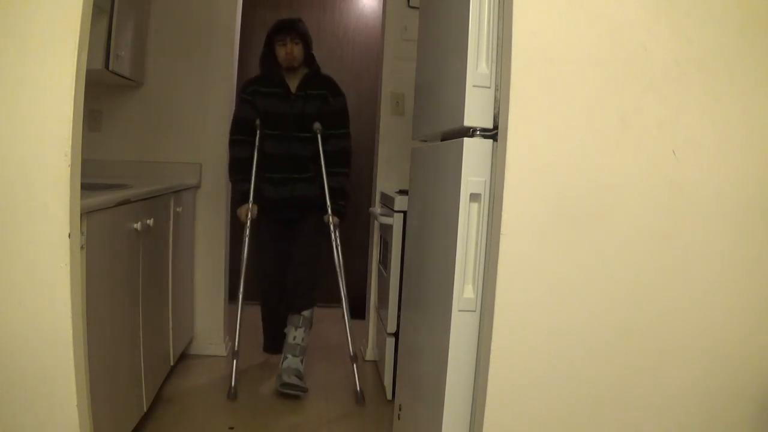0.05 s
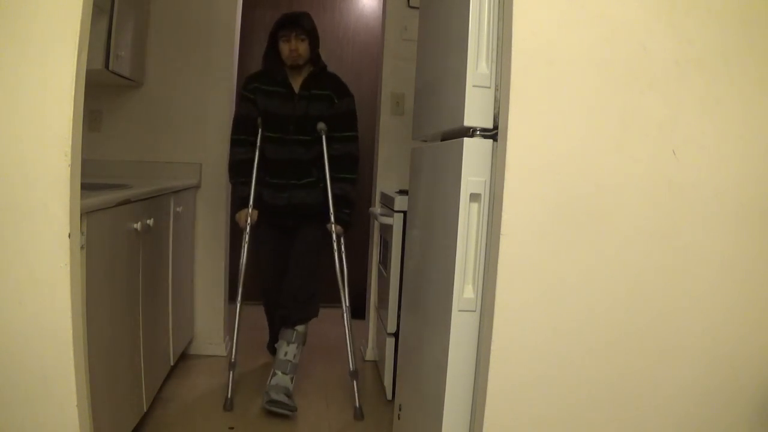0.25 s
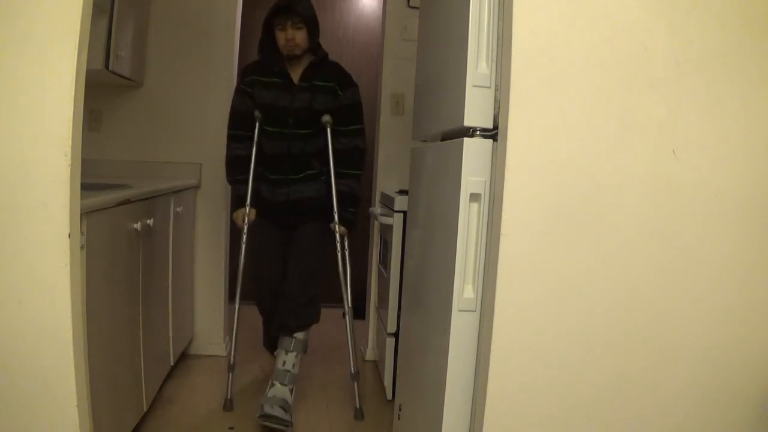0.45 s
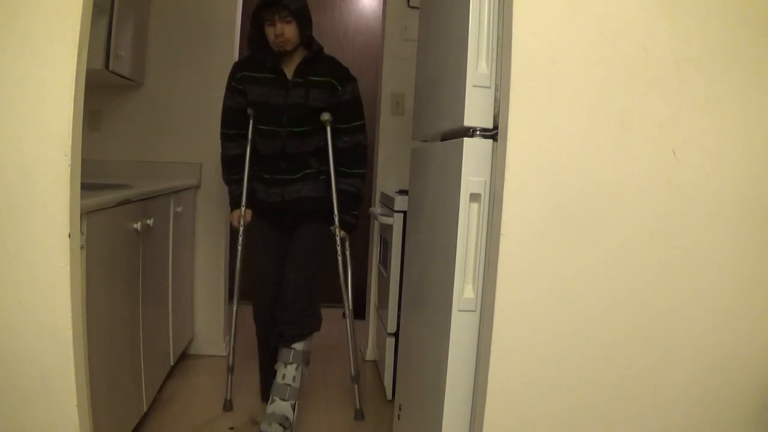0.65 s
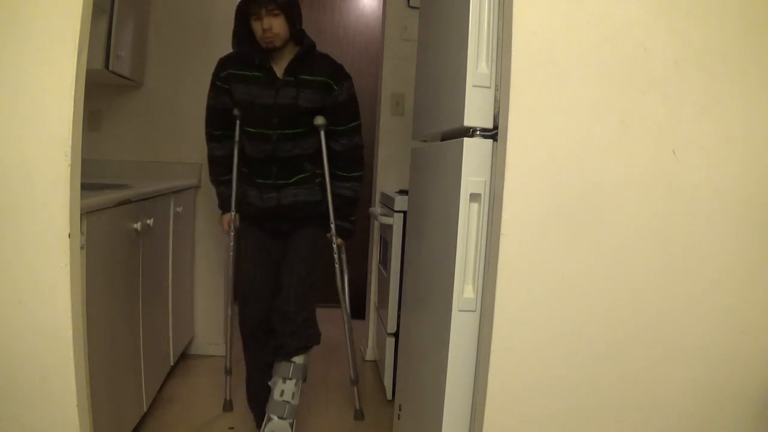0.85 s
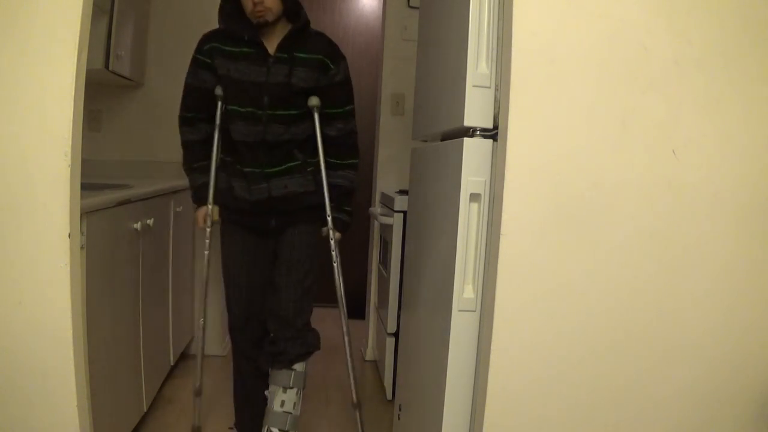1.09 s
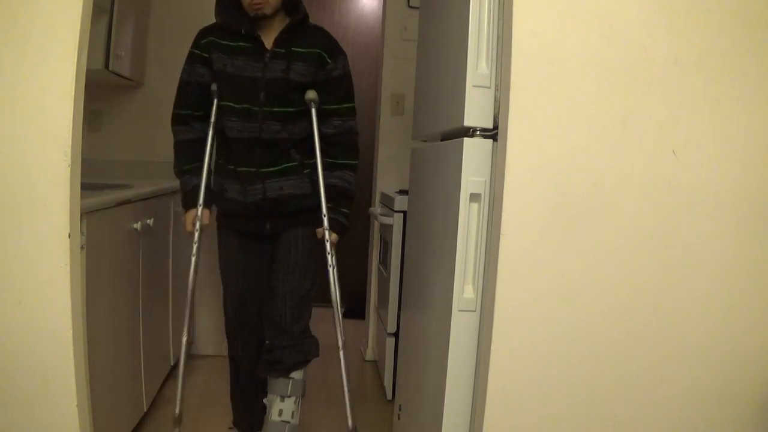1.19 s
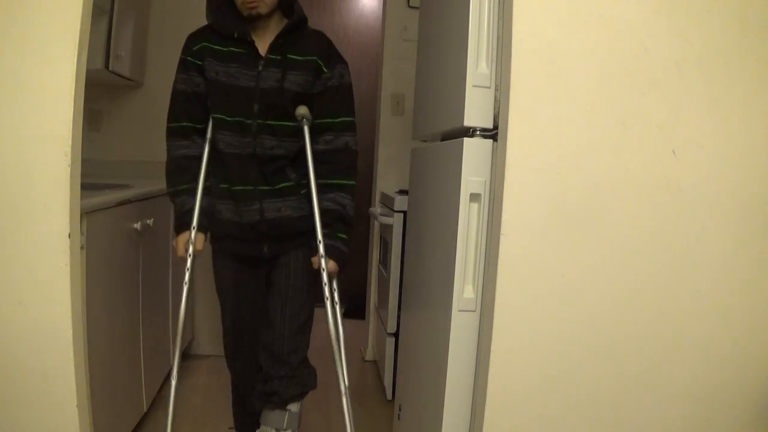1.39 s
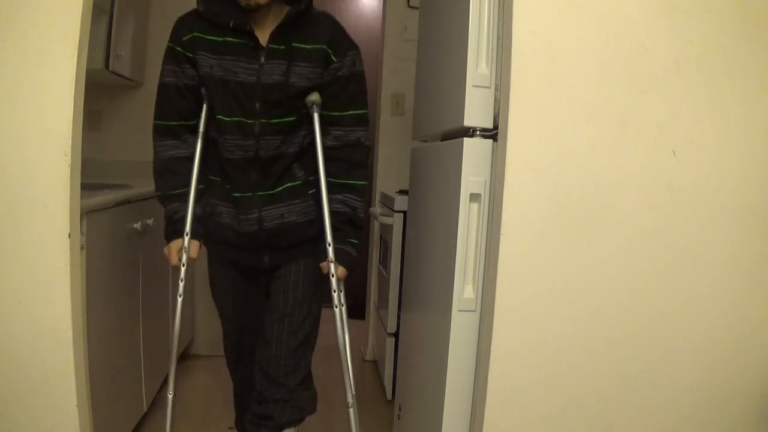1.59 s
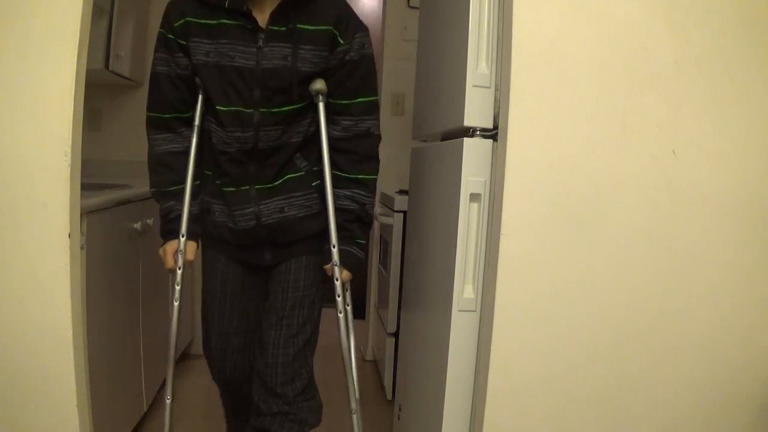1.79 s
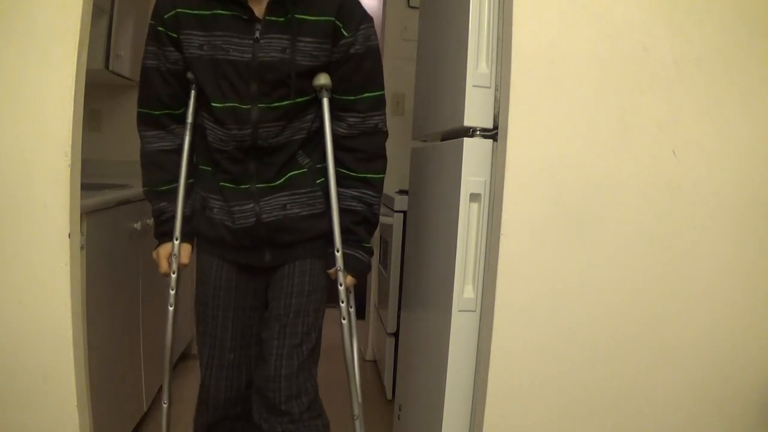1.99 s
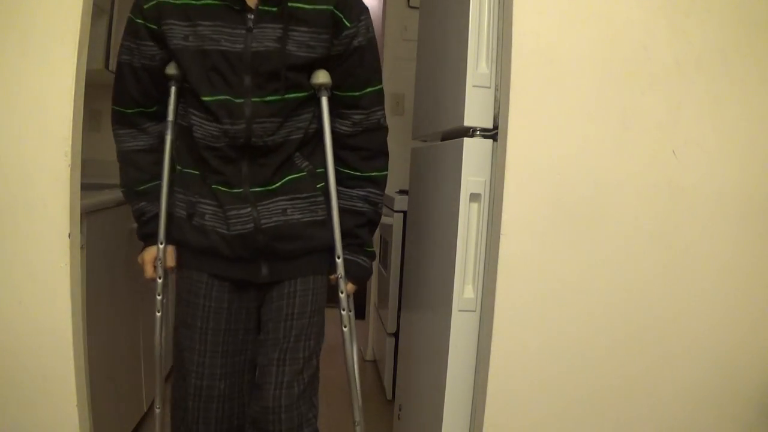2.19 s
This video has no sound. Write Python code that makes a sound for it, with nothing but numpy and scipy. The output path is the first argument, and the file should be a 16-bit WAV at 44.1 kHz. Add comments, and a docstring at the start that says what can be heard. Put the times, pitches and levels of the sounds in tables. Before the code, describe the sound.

Metal crutches clack on a hard floor for two steps in a humming kitchen.

```python
"""A small kitchen, stereo microphone: someone on metal crutches takes two steps towards it.
The two crutches land just apart: the tubes clack in their joints and ring, the tips knock, the floor
takes the weight, and the room answers close behind. Between steps come soft scrapes, scuffs of
clothing, small ticks and thin squeaks, over fan noise, a refrigerator's hum and a faint high whine."""
import sys
import numpy as np
from scipy import signal
from scipy.fft import rfft, irfft
from scipy.io import wavfile
from scipy.ndimage import uniform_filter1d

SR = 44100
rng = np.random.default_rng(int(sys.argv[2]) if len(sys.argv) > 2 else 0)


def transcribe(u):
    """Save the signal u as a 16-bit wav file named by the first command-line argument.

    u: samples, shape (n,) or (channels, n), limited to [-1, 1]; the rate is SR.
    q: integer samples, one column per channel.
    """
    v = np.clip(np.atleast_2d(u).T, -1, 1)
    q = np.round(v * 32767).astype(np.int16)
    wavfile.write(sys.argv[1], SR, q)


N = 99225
SCENE_T = np.arange(N) / SR
T = np.arange(32768) / SR  # seconds within one impact
HZ = np.fft.rfftfreq(len(T), 1 / SR)


def amp(db):
    """Decibels to gain."""
    return 10 ** (np.asarray(db) / 20)

def unit_energy(x):
    """Scales to energy 1."""
    return x / np.sqrt(np.sum(x ** 2) + 1e-20)

def unit_rms(x):
    """Scales to rms 1."""
    return x / np.sqrt(np.mean(x ** 2) + 1e-20)

def curve(points, hz):
    """Reads a table on a log-frequency axis."""
    f, value = np.transpose(points)
    return np.interp(np.log(hz + 1), np.log(f + 1), value)

def bell(hz, octaves):
    """A bell curve over log frequency."""
    return np.exp(-.5 * (np.log2((HZ + 1) / hz) / octaves) ** 2)

def coloured(x, points):
    """Filters by rows of frequency in Hz, gain in dB."""
    return irfft(rfft(x) * amp(curve(points, np.fft.rfftfreq(len(x), 1 / SR))), len(x))

def wander(hz):
    """Smooth random motion of rms 1, up to about this rate."""
    lowpass = np.exp(-(np.fft.rfftfreq(N, 1 / SR) / hz) ** 2)
    return unit_rms(irfft(rfft(rng.standard_normal(N)) * lowpass, N))

def add(mix, start, sound):
    """Adds a sound to the mix at a time in seconds."""
    part = mix[..., max(round(start * SR), 0):][..., :sound.shape[-1]]
    part += sound[..., :part.shape[-1]]

def burst(envelope, colour_db):
    """A dense run of micro-impacts under an envelope, causally coloured; energy 1."""
    log_gain = np.log(amp(np.maximum(colour_db, -80)))
    mirrored = np.r_[log_gain, log_gain[-2:0:-1]]
    response = np.exp(np.conj(signal.hilbert(mirrored)))[:len(HZ)]
    impacts = envelope * rng.choice([-1., 1.], len(T))
    for _ in range(3):  # evens out the spectrum while keeping the envelope
        spectrum = rfft(impacts)
        white = unit_rms(irfft(spectrum / (abs(spectrum) + 1e-12))) * np.sqrt(np.mean(envelope ** 2))
        impacts = envelope * np.tanh(white / (envelope + 1e-9))
    return unit_energy(irfft(rfft(impacts) * response))

def kitchen(x, tail_db, pan_db=0, lag_s=0.0032, build_s=0.0024):
    """At the microphone: direct sound, near echoes and a tail that dies faster in the treble."""
    # Each row: frequency in Hz, seconds for the tail to fall 60 dB.
    t60 = [(100, 1), (400, 0.62), (1000, 0.41), (2500, 0.41), (6000, .37), (9000, 0.27), (12000, 0.23),
           (16000, 0.18)]
    # Each row: frequency in Hz, gain of the tail's side channel in dB.
    width = [(100, -35), (500, -13), (4500, -8), (9000, -9), (13000, -23)]
    # Floor and cupboards. Each row: delay in seconds, gain in dB.
    echoes = [(.0032, -9), (.0075, -12.5), (.014, -16.5)]
    hz, t, noise = signal.stft(rng.standard_normal((2, len(T))), SR, nperseg=256)
    dying = noise * amp(-60 * t / curve(t60, hz)[:, None])
    build = 1 - np.exp(-np.maximum(T - lag_s, 0) / build_s)
    mid, side = signal.istft(dying, SR, nperseg=256)[1][:, :len(T)] * build
    side = coloured(unit_energy(side), width) * (T < T[-1] / 2)
    left_right = np.array([[1], [-1]])
    paths = amp(tail_db) * (unit_energy(mid) + left_right * side)
    paths[:, :1] += amp(left_right * pan_db / 2)
    for delay, db in echoes:
        paths[:, round(delay * SR)] += amp(db)
    return signal.fftconvolve(x[None], paths, axes=1)

def room_tone(level_db=-49, patch_db=1.5):
    """Steady fan and room noise, nearly mono in the bass."""
    # Each row: frequency in Hz, relative level in dB.
    colour = [(15, -49), (25, -14), (64, -11), (87, -14), (127, -7.5), (195, -1), (236, -0.5), (335, -8.5),
              (363, -8), (463, -11.5), (503, -14), (545, -14), (677, -13), (962, -14), (1610, -23),
              (1890, -20), (3820, -27), (11000, -29.5), (16000, -42)]
    # Each row: frequency in Hz, side against mid in dB.
    width = [(50, -24), (200, -20.5), (500, -8.5), (1000, -6), (4000, -5.5), (10000, -19)]
    hz, _, noise = signal.stft(rng.standard_normal((2, N)), SR, nperseg=2048)
    patches = uniform_filter1d(rng.standard_normal(noise.shape[1:]), size=12, axis=0)
    patches = unit_rms(uniform_filter1d(patches, size=4, axis=1))  # smooth in pitch and time
    mid, side = noise * amp(curve(colour, hz)[:, None] + patch_db * patches)
    side *= amp(curve(width, hz))[:, None]
    stereo = signal.istft(np.array([mid + side, mid - side]), SR, nperseg=2048)[1][:, :N]
    return amp(level_db) * unit_rms(stereo)

def fridge(waver_hz=2.584, flutter=0.2):
    """The refrigerator's motor tones, wavering in pitch and level."""
    # Each row: frequency in Hz, level in dB.
    tones = [(140, -65.5), (181, -58.5), (207, -55), (273, -63.5), (336.5, -57), (450, -66.5),
             (472.5, -64.5), (553, -67.5), (878, -65), (932, -64.5), (998, -64.5), (2186, -72.5)]
    hum = 0
    for hz, db in tones:
        level = 1 + flutter * wander(hz=9.9)
        turns = hz * SCENE_T + rng.random() + waver_hz * np.cumsum(wander(hz=10.5)) / SR
        hum += amp(db) * unit_rms(level * np.sin(2 * np.pi * turns))
    return hum

def whine(hz=9150, spread_hz=76, level_db=-72.5):
    """A very faint, fuzzy high whine in the background."""
    pitch = hz + spread_hz * wander(hz=150)
    return amp(level_db) * unit_rms(np.sin(2 * np.pi * np.cumsum(pitch) / SR))

def joint_clack(bite_db, edge_db, pitch, spacing_hz):
    """The loose joint slams shut and chatters on, coloured by evenly spaced tube resonances."""
    # Each row: frequency in Hz at pitch ratio 1, relative level in dB.
    spectrum = [(300, -63), (1500, -30.5), (2200, -20), (2900, -10), (3900, -13.5), (4400, -11),
                (5600, -4.5), (7200, -5.5), (8400, -0.5), (9800, 1.5), (11000, -0.5), (12200, -8),
                (15500, -17.5)]
    rise_s, hold_s, fall_s = 0.00026, 0.00156, 0.0014
    chatter_db, chatter_s, hollow_db = -16.5, 0.0027, 1
    slam = np.minimum(T / rise_s, 1) * np.exp(-np.maximum(T - hold_s, 0) / fall_s)
    chatter = amp(chatter_db) * np.exp(-T / chatter_s)
    colour = curve(spectrum, HZ / pitch)
    colour += bite_db * bell(hz=4020, octaves=.45) + edge_db * bell(hz=13500, octaves=0.26)
    colour += hollow_db * np.cos(2 * np.pi * HZ / spacing_hz)
    return burst(slam + chatter, colour)

def tube_ring(bite_db, waver_hz=22.2):
    """The tubes ring, disturbed by hands and joints; more bite wakes the middle modes."""
    # Each row: frequency in Hz, relative level in dB, seconds to fall 60 dB.
    modes = [(534.8, -17.5, 0.53), (786, -9, 0.26), (969, -17, 0.27), (1295, -21.5, 0.33),
             (1995, -12.5, 0.23), (4310, -6.5, 0.073), (5220, -11.5, 0.097), (5771, -8, 0.18),
             (6621, -8, .25), (8060, -8, .2), (8230, -1, 0.19), (8700, -19, 0.2), (9950, -26, 0.13),
             (10870, -2.5, 0.078)]
    ring = 0
    for hz, db, t60 in modes:
        turns = hz * T + rng.random() + waver_hz * np.cumsum(wander(hz=61)[:len(T)]) / SR
        lift_db = bite_db * np.interp(hz, HZ, bell(hz=2800, octaves=0.32))
        ring += amp(db + lift_db - 60 * T / t60) * np.sin(2 * np.pi * turns)
    return unit_energy(ring)

def tip_knock(lag_s=.002, rise_s=0.00076, decay_s=0.009):
    """The tip knocks on the floor just behind the clack."""
    # Each row: frequency in Hz, relative level in dB.
    colour = [(40, -18), (120, -11), (250, 0), (380, -4.5), (520, -1.5), (950, -0.5), (1400, -3.5),
              (2050, -1), (2700, -13), (5000, -23)]
    since = np.maximum(T - lag_s, 0)
    return burst(np.minimum(since / rise_s, 1) * np.exp(-since / decay_s), curve(colour, HZ))

def crutch_landings(mix, gain_db=6):
    """Each crutch comes down with a clack, a knock and a ring that carry into the room."""
    # Each row: start in seconds; clack, its 4 kHz bite and 13.5 kHz edge in dB; clack pitch ratio;
    # resonance spacing in Hz; ring, knock, room tail and left over right in dB. Levels are relative.
    landings = [(0.2081, -2.5, -7.5, 6.5, 0.96, 1400, -27, -16.5, 1, 3.5),
                (0.2213, 0.5, -3, -4.5, 1.024, 1220, -8, -14, -2, 1.5),
                (1.4704, -.5, 4.5, -8, 1, 1070, -12, -10, -3.5, 2.5),
                (1.4951, -4.5, 7, -5, 0.98, 1130, -12.5, -9, -1.5, 3)]
    for start, clack_db, bite, edge, pitch, spacing, ring_db, knock_db, tail_db, pan_db in landings:
        clack = amp(clack_db) * joint_clack(bite, edge, pitch, spacing)
        knock = amp(knock_db) * tip_knock()
        ring = amp(ring_db) * tube_ring(bite)
        add(mix, start, amp(gain_db) * kitchen(clack + knock + ring, tail_db, pan_db))

def floor_thumps(mix):
    """The floor takes the weight in soft, low swells."""
    # Each row: start in seconds, level in dB, frequency in Hz, decay in seconds.
    thumps = [(.215, -48.5, 68.6, 0.031), (.335, -52, 71, 0.023), (.475, -56, 60, 0.011),
              (1.49, -49, 45, 0.027), (1.49, -51, 113, 0.02), (1.61, -55.5, 69, 0.035)]
    for start, db, hz, decay in thumps:
        swell = T / decay * np.exp(1 - T / decay)
        add(mix, start, amp(db) * swell * np.sin(2 * np.pi * hz * T))

def crutch_ticks(mix, decay_s=0.0011, gain_db=6):
    """Short clicks of play in a crutch, each ringing around one pitch."""
    # Each row: start in seconds, relative level in dB, centre in Hz, width in octaves.
    ticks = [(.604, -32.5, 1500, 0.35), (.9632, -27.5, 6600, 0.55), (.9795, -25, 9400, 0.33),
             (.9822, -22.5, 5070, 0.12), (1.8158, -32.5, 2520, 0.32)]
    # What the crutch radiates. Each row: frequency in Hz, relative level in dB.
    body = [(400, -18), (1300, 6), (9000, -5.5), (11000, -8), (12500, -14), (16000, -25)]
    for start, db, hz, octaves in ticks:
        resonance_db = -10 * np.log10(1 + (np.log2((HZ + 1) / hz) / octaves) ** 2)
        click = burst(np.exp(-T / decay_s), curve(body, HZ) + resonance_db)
        add(mix, start, amp(db + gain_db) * kitchen(click, tail_db=-9))

def friction(strokes, colour, tail_db, grain_db=2.5):
    """Grainy hiss that swells and fades with each stroke."""
    envelope = 0
    for peak, db, rise, fall in strokes:
        width = np.where(SCENE_T < peak, rise, fall)
        envelope += amp(db) * np.exp(-.5 * ((SCENE_T - peak) / width) ** 2)
    grains = rng.standard_normal(N) * amp(grain_db * wander(hz=400))
    return kitchen(envelope * unit_rms(coloured(grains, colour)), tail_db)[:, :N]

def floor_scrapes():
    """Soft rubbing on the floor, with little room on it."""
    # Each row: peak time in seconds, level in dB, rise and fall in seconds.
    strokes = [(.612, -57.5, 0.0095, 0.013), (.71, -61, 0.081, 0.042), (.975, -56, 0.019, 0.029),
               (2.14, -60.5, 0.035, 0.072)]
    # Each row: frequency in Hz, relative level in dB.
    colour = [(300, -20), (1200, 0), (2300, -2.5), (3500, -5.5), (7000, -14), (12000, -37)]
    return friction(strokes, colour, tail_db=-12)

def clothing_scuffs():
    """Cloth rubs brightly as the body swings through."""
    # Each row: peak time in seconds, level in dB, rise and fall in seconds.
    strokes = [(0.827, -46.5, .02, 0.022), (.985, -56.5, 0.025, 0.02), (2.11, -50, 0.035, 0.035)]
    # Each row: frequency in Hz, relative level in dB.
    colour = [(300, -17), (1500, -17), (4200, -10), (6500, -10), (8800, -3), (10200, -5), (12000, -10),
              (15500, -20)]
    return friction(strokes, colour, tail_db=-3.5)

def thin_squeaks(mix, waver=.005, flutter=0.42):
    """Faint, unsteady high whistles."""
    # Each row: start and length in seconds, level in dB, pitch in Hz.
    squeaks = [(.865, 0.082, -63, 10700), (1.02, 0.041, -66, 10900), (1.15, 0.1, -70, 11040),
               (2.135, 0.11, -58.5, 10630)]
    for start, length, db, hz in squeaks:
        n = round(length * SR)
        pitch = hz * (1 + waver * wander(hz=200)[:n])
        level = np.sin(np.pi * np.arange(n) / n) * (1 + flutter * wander(hz=120)[:n])
        add(mix, start, amp(db) * unit_rms(level * np.sin(2 * np.pi * np.cumsum(pitch) / SR)))

def scene():
    """The kitchen as it reaches the microphone."""
    mix = room_tone() + fridge() + whine() + clothing_scuffs() + floor_scrapes()
    crutch_landings(mix)
    floor_thumps(mix)
    crutch_ticks(mix)
    thin_squeaks(mix)
    return mix

def record(dry):
    """The recorder's band limit, at 15.9 kHz."""
    lowpass = signal.firwin(511, 15900, window=("kaiser", 9), fs=SR)
    return signal.oaconvolve(dry, lowpass[None], "same", axes=1)


dry = scene()
out = record(dry)
transcribe(out)
```